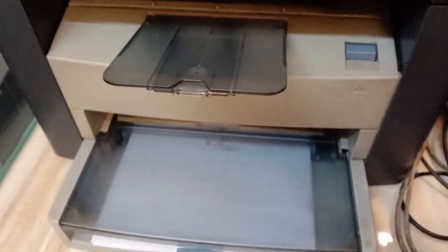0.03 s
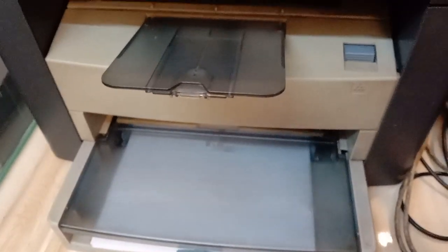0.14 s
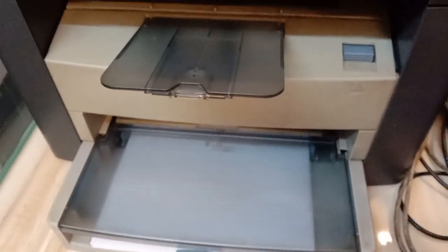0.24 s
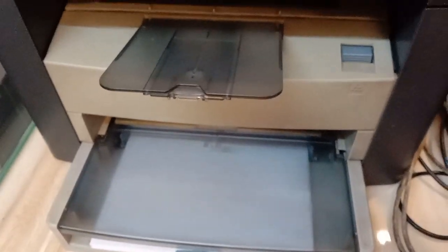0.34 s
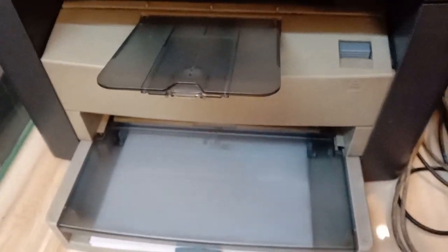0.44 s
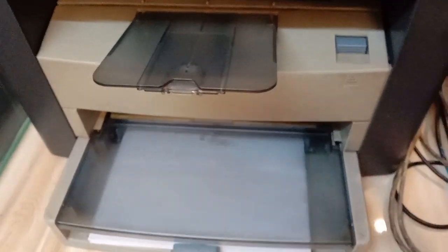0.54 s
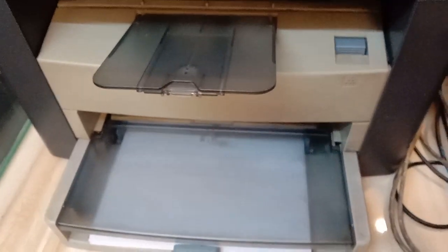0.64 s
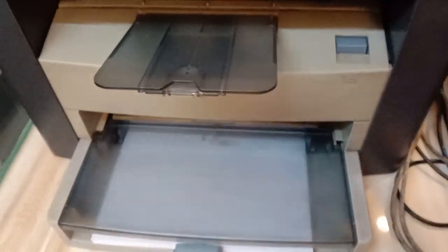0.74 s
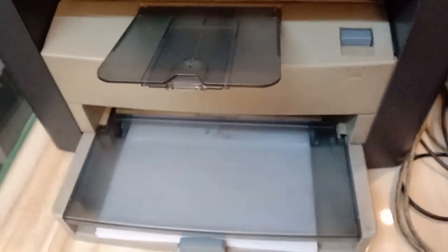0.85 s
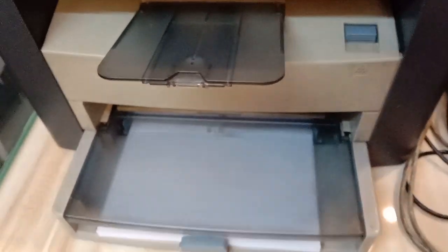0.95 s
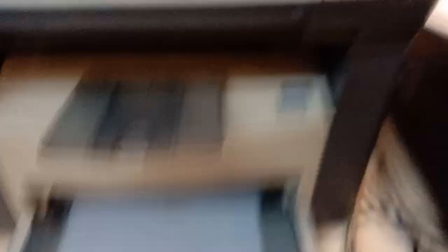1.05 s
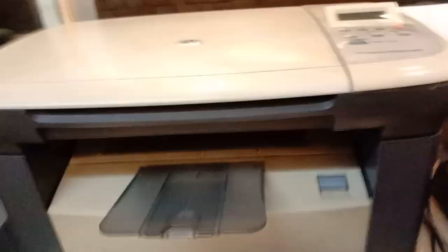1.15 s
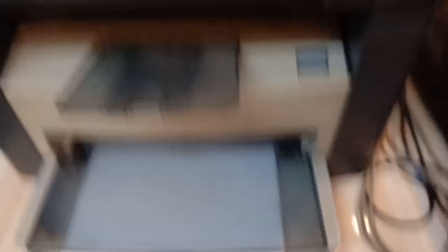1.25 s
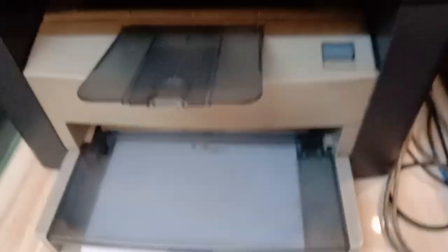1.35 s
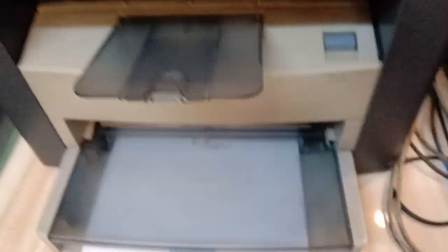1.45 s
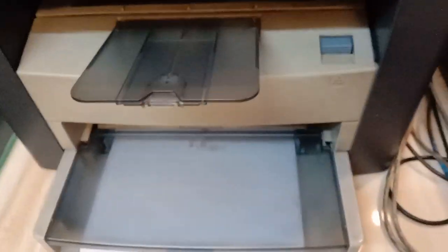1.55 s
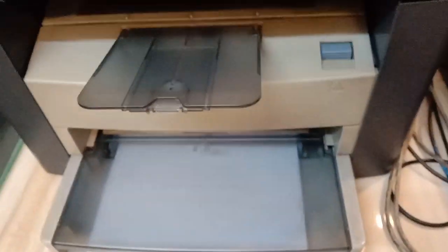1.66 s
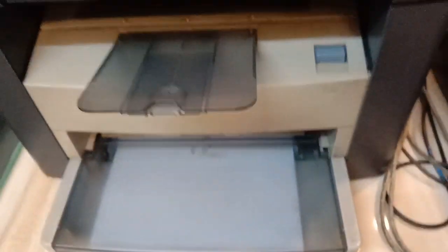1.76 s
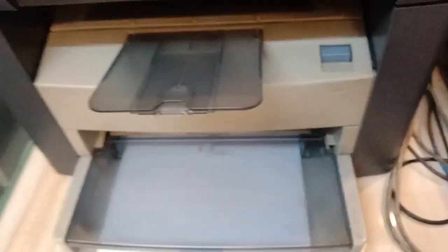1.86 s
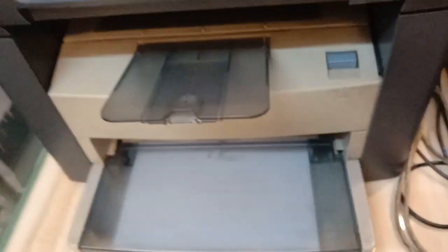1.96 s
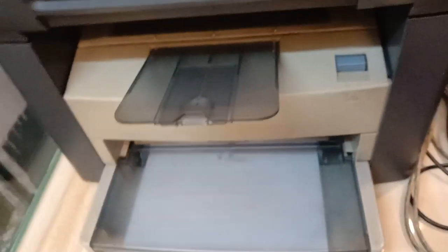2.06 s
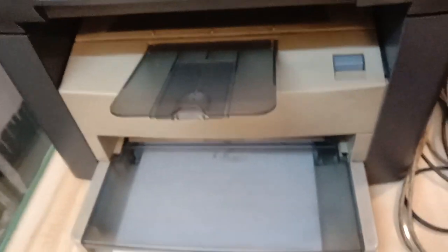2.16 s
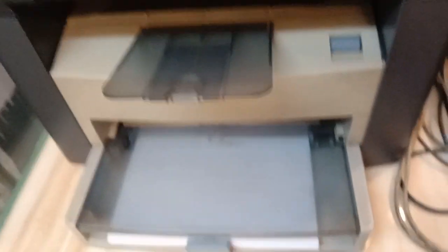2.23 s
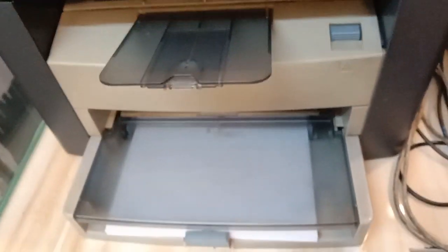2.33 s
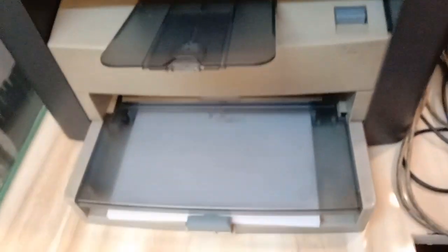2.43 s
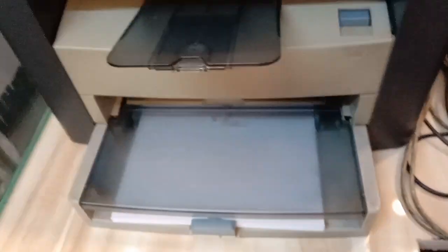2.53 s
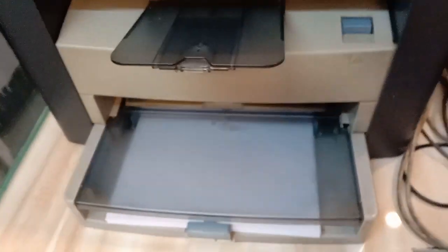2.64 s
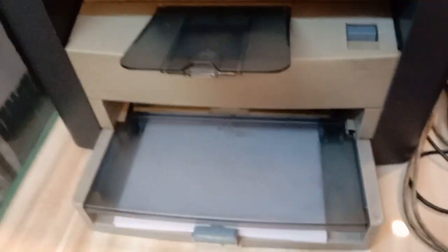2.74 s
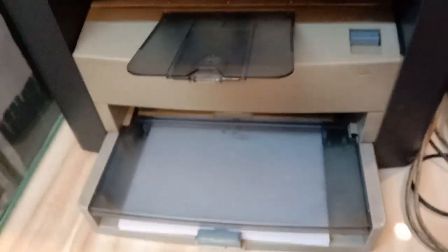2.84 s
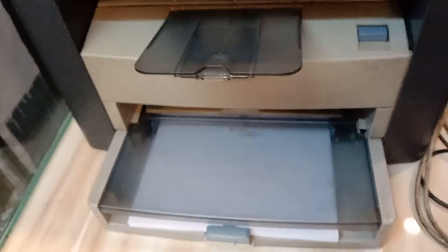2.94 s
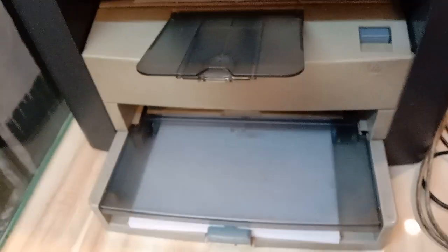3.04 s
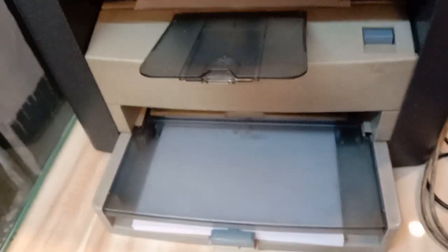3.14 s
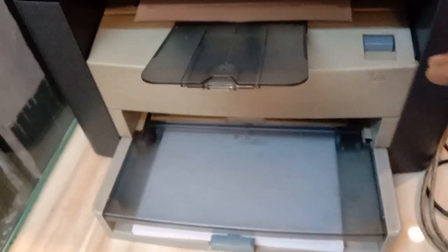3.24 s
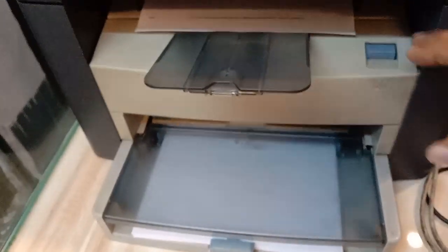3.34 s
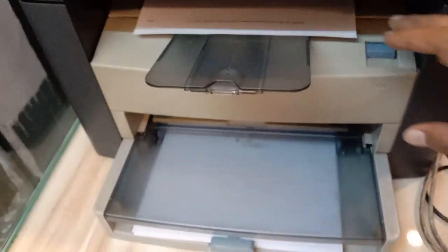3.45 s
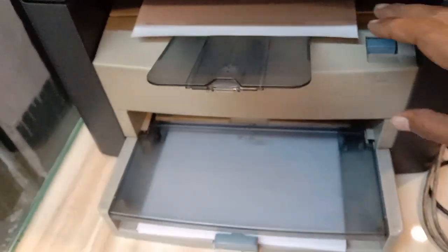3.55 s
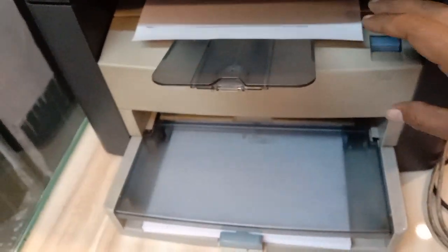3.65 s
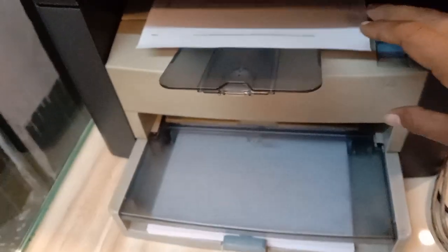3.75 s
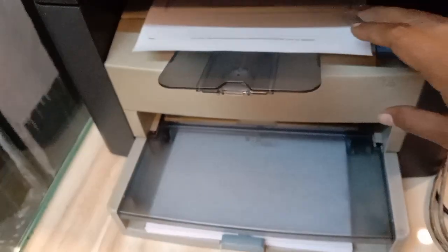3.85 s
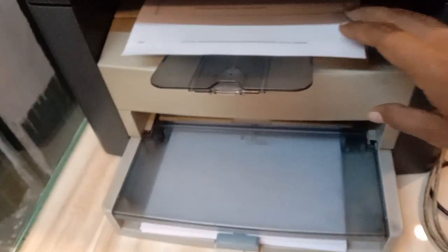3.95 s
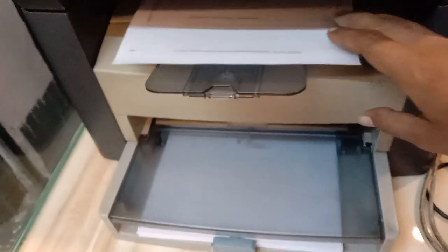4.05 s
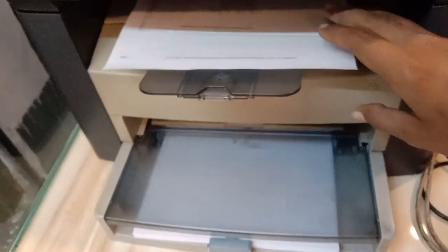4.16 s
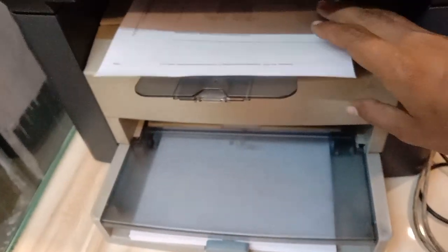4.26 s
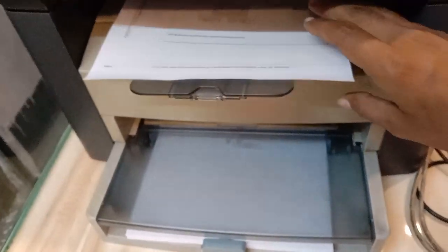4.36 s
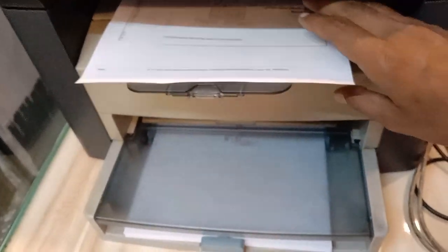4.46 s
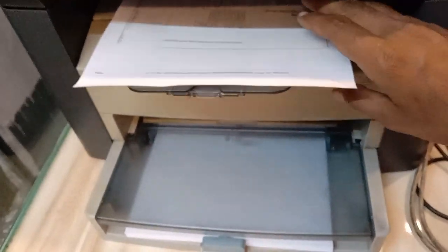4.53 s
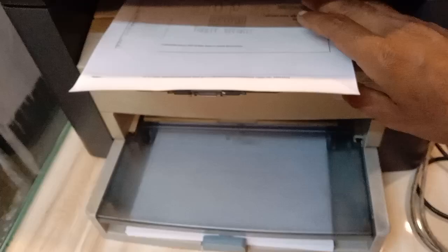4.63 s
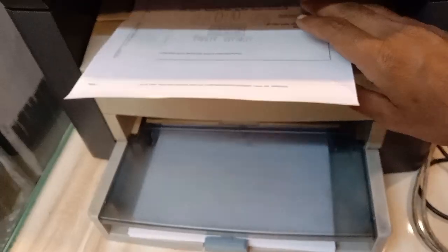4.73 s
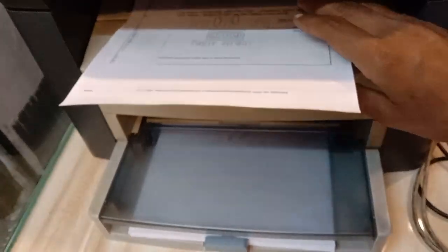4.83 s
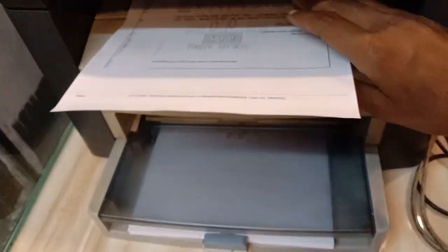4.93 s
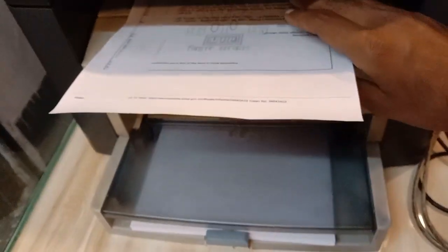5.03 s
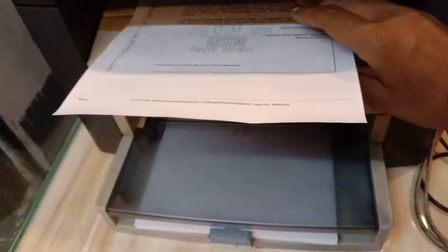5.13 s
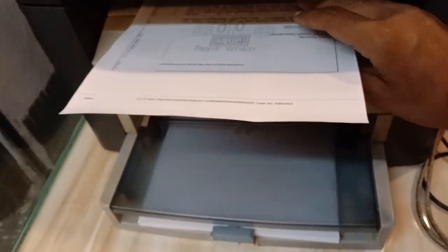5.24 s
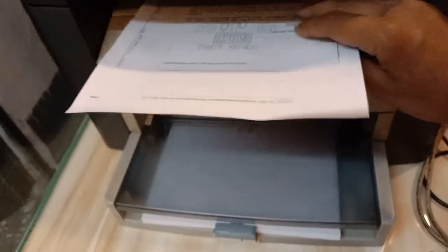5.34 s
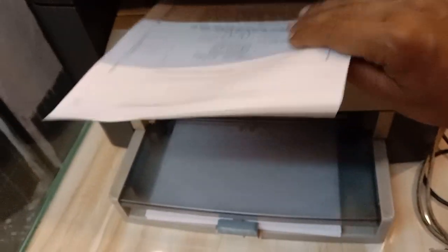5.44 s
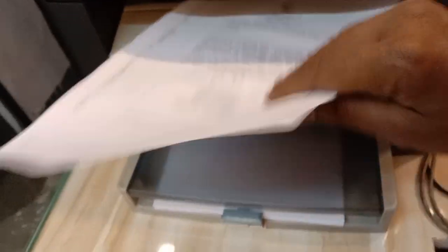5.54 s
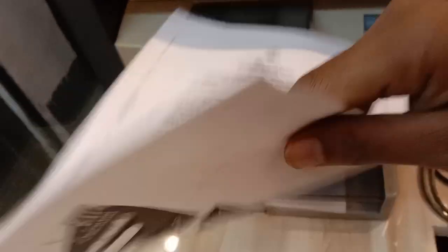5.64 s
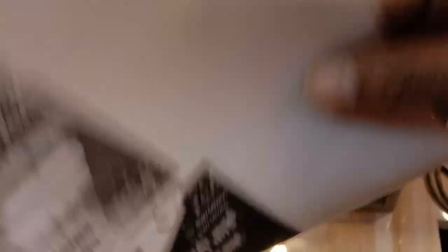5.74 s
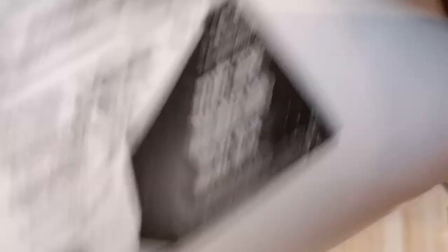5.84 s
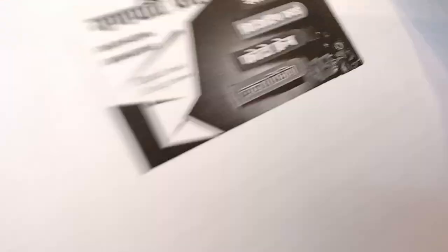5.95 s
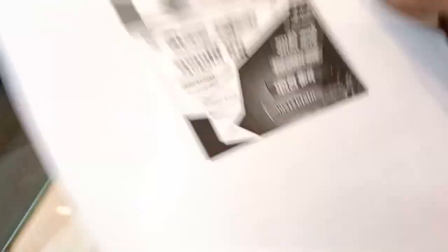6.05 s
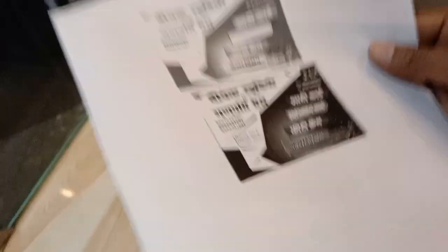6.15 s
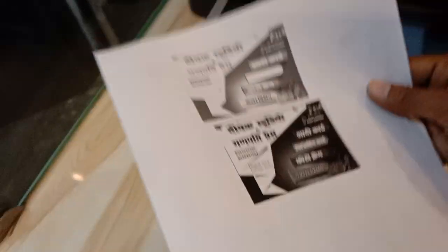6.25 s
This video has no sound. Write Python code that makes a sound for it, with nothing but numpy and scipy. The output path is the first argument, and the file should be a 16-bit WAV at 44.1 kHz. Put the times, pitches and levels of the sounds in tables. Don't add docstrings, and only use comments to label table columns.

```python
import sys
import numpy as np
from scipy import signal
from scipy.fft import rfft, irfft
from scipy.io import wavfile
from scipy.ndimage import uniform_filter1d, map_coordinates

SR = 44100
rng = np.random.default_rng(int(sys.argv[2]) if len(sys.argv) > 2 else 0)


def field_ratio(decibels):
    return 10 ** (np.asarray(decibels, dtype=float) / 20)


def wrap_up_sound(samples):
    columns = np.atleast_2d(samples).T
    tamed = np.clip(columns, -1, 1)
    steps = np.round(tamed * 32767).astype(np.int16)
    wavfile.write(sys.argv[1], SR, steps)


N = 277389
TIME = np.arange(N) / SR
SHAFT_HZ = 20.92
WHINE_STOP_S = 4.803


def walk(rate):
    hold = int(SR / rate)
    steps = np.repeat(rng.standard_normal(N // hold + 1), hold)
    smooth = uniform_filter1d(uniform_filter1d(steps, hold), hold)
    return 1.5 * smooth[:N]


def curves(table):
    s, *columns = np.transpose(table)
    return [np.interp(TIME, s, column) for column in columns]


def turning(hz, mean_db, swing_db, crest_s):
    return mean_db + swing_db * np.cos(2 * np.pi * hz * (TIME - crest_s))


def swells(events, width_s):
    return sum(db * np.exp(-((TIME - s) / width_s) ** 2 / 2) for s, db in events)


def dying(t, t60):
    return np.exp(-np.log(1000) * t / t60)


def tone(hz, db):
    return np.sqrt(2) * field_ratio(db) * np.sin(2 * np.pi * (hz * TIME + rng.random()))


def bed(spectrum, db, grain_db, patch_db, ripple_db):
    grains = np.minimum(rng.exponential(size=N // 64 + 1), 4)
    sizes = uniform_filter1d(np.repeat(field_ratio(grain_db * grains), 64)[:N], size=64)
    hz, s, cells = signal.stft(rng.standard_normal(N) * sizes, SR, nperseg=1024)
    octave = np.log2(np.maximum(hz, 1))
    points_hz, points_db = np.transpose(spectrum)
    colour = np.interp(octave, np.log2(points_hz), points_db, left=-200, right=-200)
    colour += ripple_db * np.sqrt(3) * uniform_filter1d(rng.standard_normal(len(hz)), size=3)
    pitch_place, time_place = np.meshgrid(9 * octave, s, indexing="ij")
    patches = 0
    for rate in (3, 25):
        heights = rng.standard_normal((140, 200))
        patches = patches + map_coordinates(heights, [pitch_place, rate * time_place], order=1)
    out = signal.istft(cells * field_ratio(colour[:, None] + patch_db * patches), SR)[1][:N]
    return out / np.std(out) * field_ratio(db)


def room(x):
    t = np.arange(SR // 3) / SR
    tail = rng.standard_normal(len(t)) * dying(t, 0.2) * (t > 0.004)
    return x + field_ratio(-15) * signal.fftconvolve(x, tail / np.linalg.norm(tail))[:N]


def air_swells():
    # crest t/s, width/s, lift level/dB, extra lift level/dB
    swell_table = [(0.0, 0.23, 7.5, -5), (1.1, 0.11, 11.5, 6), (1.55, 0.026, 8, 5), (1.75, 0.18, 5.5, -7),
                   (2.55, 0.38, 4.5, -3), (2.86, 0.14, 7.5, -1), (3.45, 0.15, 10, 9), (3.85, 0.2, 7, -1),
                   (4.45, 0.14, 8.5, 1), (5.08, .06, 4, 4), (5.54, 0.028, 5.5, 3), (5.78, 0.13, 10, -3)]
    s, width, lift_db, extra_db = np.transpose(swell_table)[:, :, None]
    shape = np.exp(-((TIME - s) / width) ** 2 / 2)
    return (lift_db * shape).sum(axis=0), (extra_db * shape).sum(axis=0)


def air(lift_db, extra_db):
    # f/Hz, level/dB per Hz
    air_colour = [(7500, -10), (8300, -6), (9500, -6), (11000, -8), (13000, -12.5), (14200, -16)]
    # f/Hz, level/dB per Hz
    sheen_colour = [(13300, -20), (14000, -9), (14500, -1), (15100, 1), (15500, -1), (15600, -30)]
    air_db = -74.5 + lift_db - 1 * (TIME > WHINE_STOP_S)
    sheen_db = -78.5 + lift_db + extra_db
    out = bed(air_colour, air_db + 0.5, grain_db=1.5, patch_db=-1.5, ripple_db=3.5)
    return out + bed(sheen_colour, sheen_db + 0.6, grain_db=0.6, patch_db=1.5, ripple_db=0.6)


def rumble(slide_db):
    # f/Hz, level/dB per Hz
    rumble_colour = [(25, -19), (45, -32), (68, -30), (92, 8.5), (130, -9), (240, 7), (320, -6), (420, 12),
                     (620, 4.5), (760, -18.5), (1000, -2.5), (1100, -4)]
    level_db = -53 + 0.057 * (slide_db + 53.5)
    return bed(rumble_colour, level_db, grain_db=1.2, patch_db=3.5, ripple_db=2.5)


def panel():
    # f/Hz, level/dB per Hz
    panel_colour = [(1150, 4), (1230, -14), (1270, 14), (1310, -17), (1400, -87)]
    level_db = -61.5 - 4 * (abs(TIME - 4.95) < 0.16)
    return bed(panel_colour, level_db, grain_db=0.3, patch_db=3, ripple_db=0.1)


def mirror_motor():
    # t/s, then level/dB of the second, third and fifth multiple
    facing = [(0, -61, -80, -77), (.4, -63, -75, -73), (.7, -60, -80, -75), (1.15, -64, -78, -72),
              (1.6, -59, -76, -79), (1.9, -58, -67, -78), (2.2, -68, -69, -79), (2.5, -64, -70, -82),
              (2.8, -69, -67, -67), (3.1, -77, -68, -66), (3.4, -81, -73, -68), (3.7, -75, -75, -65),
              (4.1, -71, -77, -68), (4.6, -70, -74, -70), (4.9, -64, -77, -76), (5.25, -64, -72, -71),
              (5.55, -69, -68, -74), (5.9, -80, -78, -76)]
    mirror_hz = 1010.2
    return sum(tone(k * mirror_hz, db + 2 * walk(18)) for k, db in zip((2, 3, 5), curves(facing)))


def rings():
    # t/s, peak level/dB, f/Hz, time to fall 60 dB/s
    ring_table = [(.06, -44, 820, 0.03), (.08, -41, 784, 0.026), (.17, -44.5, 780, .04),
                  (0.4151, -28.5, 1170, .015), (.415, -27.5, 554, 0.022), (.416, -38.5, 1990, 0.028),
                  (2.833, -36, 2200, .03), (5.128, -44, 3300, 0.045), (5.165, -46.5, 1270, 0.15),
                  (5.687, -38, 554, 0.043), (5.835, -53, 770, .04), (5.89, -39.5, 793, 0.068),
                  (.281, -31, 850, 0.031), (.413, -26, 826, .025), (.428, -31, 1265, 0.053),
                  (0.522, -36, 1235, 0.041), (1.848, -28, 1250, 0.081), (2.285, -36, 1530, 0.043),
                  (2.289, -47, 1270, .05), (2.411, -43, 910, 0.047), (2.51, -33.5, 1227, 0.045),
                  (2.661, -33.5, 1260, 0.071), (3.112, -44, 950, 0.045), (3.179, -32.5, 1210, 0.031),
                  (3.215, -46, 2570, .04), (3.6058, -31.5, 3690, 0.027), (3.6058, -30.5, 7100, .018),
                  (3.608, -33, 5780, .045), (3.612, -40, 11000, .025), (4.822, -44, 3050, 0.048),
                  (4.824, -53, 4050, .04), (4.827, -56, 5600, .03), (4.8407, -37, 1740, 0.07),
                  (4.842, -46, 4970, .03), (4.85, -39, 2940, .03), (4.919, -52, 1810, 0.078),
                  (4.92, -54, 5080, .05), (5.754, -40, 250, 0.087), (5.794, -43.5, 1040, 0.054),
                  (5.839, -43, 238, .07), (5.875, -38, 2420, .02), (5.879, -37, 1840, .025),
                  (5.884, -32, 1144, 0.025), (5.896, -36, 1000, .03), (5.93, -47, 1270, 0.23),
                  (6.189, -47, 1290, 0.035)]
    rise_cycles = 2.5
    t = np.arange(8192) / SR
    out = np.zeros(N + len(t))
    for s, db, hz, t60 in ring_table:
        shape = (1 - np.exp(-t * hz / rise_cycles)) * dying(t, t60)
        start = int(s * SR)
        out[start:start + len(t)] += field_ratio(db) * shape / shape.max() * np.sin(2 * np.pi * hz * t)
    return out[:N]


def bursts():
    # t/s, level/dB, centre f/Hz, spread/octaves
    tick_table = [(0.397, -44, 1080, 0.35), (0.405, -34, 1240, 0.11), (0.422, -41, 1100, 0.65),
                  (0.43, -50, 1250, 0.18), (0.485, -53, 2600, 0.33), (1.21, -55, 3000, 0.48),
                  (1.542, -68, 6000, 0.53), (1.85, -48, 1540, 0.37), (1.939, -41.5, 1960, 0.38),
                  (2.287, -41, 2000, 0.6), (2.411, -44, 900, 1.18), (2.509, -43.5, 2060, 0.71),
                  (2.593, -44.5, 2430, 0.44), (2.658, -45, 1700, 0.42), (2.717, -69, 8000, .8),
                  (2.939, -52, 4000, 1.1), (3.179, -48.5, 2550, 0.59), (3.197, -48, 1350, 0.99),
                  (3.214, -44, 1330, 0.84), (3.613, -39, 3000, 0.97), (.283, -53, 3200, 0.66),
                  (3.845, -47, 1830, 0.99), (3.925, -56, 2720, .28), (4.062, -61, 6800, 0.27),
                  (4.429, -60, 8000, .31), (4.498, -52.5, 2770, 0.75), (5.122, -45.5, 8000, 0.51)]
    # t/s, level/dB, centre f/Hz, spread/octaves
    gate_table = [
        (3.6062, -35, 8000, .9),
        (3.614, -46, 3800, .1),
    ]
    # t/s, level/dB, centre f/Hz, spread/octaves
    blow_table = [(0.4132, -30, 900, 0.22), (0.4148, -38.5, 3000, 0.49), (1.179, -53, 1900, 0.29),
                  (1.8482, -43, 2000, 0.67), (2.286, -57, 9000, 0.56), (2.495, -56, 5000, .8),
                  (2.51, -55, 6500, 0.62), (2.549, -58, 7500, 0.48), (2.5953, -59, 7000, 0.65),
                  (1.75, -63, 5040, 0.55), (1.621, -62, 5200, .3), (2.02, -52, 850, 0.22),
                  (3.132, -63, 5200, 0.2), (3.18, -69, 5500, 0.54), (3.199, -72, 6800, .2),
                  (3.214, -50, 5270, 0.13), (5.678, -56, 1490, 1.1), (5.793, -52, 1500, 0.7),
                  (5.879, -42, 2300, 0.49), (5.885, -42, 1110, 0.2), (5.904, -47, 1090, 0.17),
                  (6.188, -51, 1300, 0.45), (4.843, -46, 1980, 0.28)]
    # t/s, level/dB, centre f/Hz
    snap_table = [
        (1.13, -42, 11000),
        (1.179, -48, 11000),
    ]
    # t/s, level/dB, f/Hz, length/s
    ping_table = [(0.072, -66, 770, 0.014), (0.174, -68, 780, 0.01), (0.294, -48, 810, 0.0038),
                  (0.523, -42, 1184, 0.004), (1.563, -63, 5600, 0.087), (2.546, -58, 9300, .003),
                  (2.587, -57.5, 9300, .003), (2.675, -61, 5530, 0.016), (3.26, -53.5, 2200, .004),
                  (3.62, -53, 5900, .008), (3.616, -51, 7200, .003), (4.062, -52, 2650, .008),
                  (4.589, -51.5, 2740, .004), (4.839, -49, 1700, 0.014), (4.918, -60, 1790, 0.019),
                  (5.095, -53, 585, 0.0087), (5.133, -54.5, 1270, 0.025), (5.936, -55, 1270, 0.018)]
    # t/s, level/dB, centre f/Hz, spread/octaves, length/s
    rustle_table = [(0.309, -48.5, 267, 0.14, 0.13), (0.414, -41.5, 330, 0.36, 0.037),
                    (0.429, -57, 1800, 1, 0.049), (1.584, -66, 2050, 1.15, 0.14),
                    (2.83, -38.5, 2110, 0.73, 0.015), (2.845, -39, 2020, 0.5, 0.01),
                    (2.907, -53, 2760, 0.39, 0.15), (4.822, -50, 2600, 0.57, 0.021),
                    (4.831, -45, 2430, 0.24, 0.017), (5.112, -41, 2820, 0.66, 0.021),
                    (5.138, -50, 2130, 0.91, 0.028), (5.505, -56, 4380, 0.54, 0.012),
                    (5.662, -49, 1600, 0.78, 0.039), (5.664, -48, 414, 0.56, 0.091),
                    (2.36, -49.5, 190, 0.18, 0.076), (1.526, -57.5, 5200, 0.23, 0.075),
                    (0.496, -66, 1480, 0.27, 0.15), (5.738, -62, 1460, 1, 0.12),
                    (5.803, -55, 850, 0.24, 0.12), (5.863, -43, 1800, 0.6, 0.033),
                    (2.689, -62, 7000, .18, 0.059), (2.83, -60, 5300, .1, 0.17),
                    (2.964, -57, 5020, 0.093, 0.16), (5.071, -51, 260, 0.63, 0.16),
                    (6.037, -62, 2520, 0.71, 0.034), (6.184, -43, 1130, 0.15, 0.016),
                    (6.19, -59, 2390, 0.68, 0.028)]
    # spread/octaves, length/s, time to fall 60 dB/s
    every = [(*row, 0.0073, 0.095) for row in tick_table]
    every += [(*row, 0.0015, 0.03) for row in gate_table]
    every += [(*row, 0.0019, 0.097) for row in blow_table]
    every += [(*row, 0.38, 0.0009, 0.012) for row in snap_table]
    every += [(s, db, hz, 0.077, length, 0.1) for s, db, hz, length in ping_table]
    every += [(*row, 0.11) for row in rustle_table]
    return every


def clicks():
    # f/Hz, width/Hz, boost level/dB
    casing_table = [(1270, 22, 22), (1960, 32, -14), (3220, 83, 9), (5600, 220, 10.5), (7470, 1700, 13),
                    (11000, 210, 7), (15500, 2300, 16), (9300, 630, 6.5), (13500, 570, -13),
                    (8000, 600, -22)]
    t = np.arange(8192) / SR
    hz = np.maximum(np.arange(len(t) // 2 + 1) * SR / len(t), 1)
    casing = field_ratio(sum(db / (1 + (2 * (hz - f) / width) ** 2) for f, width, db in casing_table))
    out = np.zeros(N + len(t))
    for s, db, centre_hz, spread, length, t60 in bursts():
        parts = field_ratio(16 * uniform_filter1d(rng.standard_normal(len(hz)), size=50))
        hump = np.exp(-(np.log2(hz / centre_hz) / spread) ** 2 / 2)
        burst = irfft(rfft(rng.standard_normal(len(t))) * casing * parts * hump)
        crackle = field_ratio(4.5 * uniform_filter1d(np.repeat(rng.standard_normal(128), 64), size=64))
        rise_s = 0.000064 + 0.17 * max(length - 0.005, 0)
        shape = np.clip(t / rise_s, 0, 1) * dying(np.maximum(t - length, 0), t60)
        start = int(s * SR)
        out[start:start + len(t)] += field_ratio(db) * burst / np.std(burst) * crackle * shape
    treble_limit = signal.ellip(10, 0.2, 70, 15500, fs=SR, output="sos")
    return signal.sosfilt(treble_limit, room(out[:N]))


def latch():
    # t/s, peak level/dB
    blow_times = [
        (1.08922, -8.5),
        (1.0902, -3),
        (1.09098, -9),
    ]
    # f/Hz, level/dB, time to fall 60 dB/s
    housing_notes = [(1270, -12, 0.042), (1330, -9, .011),
                     (660, 4, 0.013), (850, 10.5, 0.0028), (1600, 8, 0.0032), (2420, -3.5, 0.0041),
               (3000, -12, 0.0034), (3800, 3, 0.0015), (5200, -10, 0.0027), (6860, -12.5, 0.0033),
               (11000, 2, 0.00084), (14600, -14, 0.0041)]
    t = np.arange(4096) / SR

    def swing(hz, db, t60):
        return field_ratio(db) * np.sin(2 * np.pi * hz * t) * dying(t, t60)

    ring = -sum(swing(*mode) for mode in housing_notes) * (1 - np.exp(-t / 0.00031))
    out = np.zeros(N)
    for s, db in blow_times:
        start = int(s * SR)
        out[start:start + len(t)] += field_ratio(db) * ring
    out = signal.sosfilt(signal.butter(2, 480, "high", fs=SR, output="sos"), out)
    start = int(blow_times[1][0] * SR)
    out[start:start + len(t)] += swing(114, -30, 0.026)
    return out


def sheet_travel():
    # t/s, slide level/dB, scrape level/dB
    sheet = [(0.0, -51, -57), (0.46, -52, -63), (0.68, -57.5, -63.5), (0.95, -60.5, -63), (1.2, -52.5, -65),
             (1.5, -59.5, -61.5), (1.66, -50, -68), (1.89, -44.5, -65), (2.1, -48.5, -64.5),
             (2.6, -44.5, -64), (2.74, -47, -58.5), (2.95, -57, -59.5), (3.7, -58, -62),
             (4.5, -56.5, -60.5), (4.85, -59, -64.5), (5.25, -62.5, -67), (5.8, -65.5, -64),
             (6.29, -66, -71)]
    return curves(sheet)


def paper(slide_db, scrape_db, lift_db):
    # f/Hz, level/dB per Hz
    slide_colour = [(500, -49), (800, 1), (1100, -4), (1270, 23.5), (1450, 7.5), (2100, 6.5), (2700, 5.5),
                    (3300, 7.5), (3900, -6), (4800, -19)]
    # f/Hz, level/dB per Hz
    hiss_colour = [(3300, 4.5), (4000, 6.5), (4400, -2.5), (5100, 8.5), (5700, 5.5), (6400, -1.5),
                   (7200, 4.5), (8000, -6.5), (9000, -33)]
    # f/Hz, level/dB per Hz
    streak_colour = [(1350, -27), (1500, -0.5), (2200, 4), (3000, -4), (3600, -9.5), (4200, -18)]
    # f/Hz, level/dB per Hz
    low_band_colour = [(640, -31), (720, -1.5), (800, 11.5), (900, 1.5), (960, -20)]
    hiss_db = scrape_db + 0.5 * lift_db
    low_band_db = -67.5 + 0.32 * (slide_db + 52.5)
    out = bed(slide_colour, slide_db - 1.2, grain_db=2.4, patch_db=3.3, ripple_db=2.4)
    out += bed(hiss_colour, hiss_db + 0.35, grain_db=2.4, patch_db=3.2, ripple_db=2.2)
    out += bed(streak_colour, slide_db - 4.5, grain_db=3.5, patch_db=3.5, ripple_db=3)
    return out + bed(low_band_colour, low_band_db, grain_db=2, patch_db=5.5, ripple_db=-3.5)


def hand():
    # t/s, level/dB
    hand_table = [
        (5.0, -72),
        (5.1, -56),
        (5.3, -80),
        (5.62, -64),
        (5.69, -46),
        (5.77, -57.5),
        (5.89, -52),
        (5.97, -60),
        (6.29, -69),
    ]
    # f/Hz, level/dB per Hz
    hand_colour = [(180, -15), (260, 8), (400, -1), (800, 3), (1200, -2), (2000, -7), (4000, -4.5),
                   (5000, -37)]
    hand_db = np.where(TIME > hand_table[0][0], curves(hand_table)[0], -120)
    return bed(hand_colour, hand_db, grain_db=3, patch_db=6.5, ripple_db=6)


def rollers():
    # t/s, lift level/dB
    knock_table = [(.08, 14.5), (.3, 8), (.5, 20), (.9, 20.5), (1.21, 21.5), (1.55, 17), (1.79, 19.5),
                   (1.95, 12.5), (2.1, 13), (2.42, 21), (3.15, 16), (3.83, 9.5), (4.5, 19), (4.86, 2.5),
                   (5.11, 7), (5.76, 15), (5.93, 14), (6.252, 9)]
    # f/Hz, level/dB per Hz
    knock_colour = [(140, -17), (175, 3), (220, 8.5), (265, 7.5), (320, -21)]
    drone_db = turning(1.5, -65.5, 3.9, 0.43) + np.interp(TIME, [0.9, 1.3, 1.7], [-2, -9, 0])
    knock_db = -68 + swells(knock_table, 0.076)
    out = tone(87, drone_db + 1.5 * walk(12))
    out += bed(knock_colour, knock_db, grain_db=-5, patch_db=5, ripple_db=3)
    return out + tone(215.7, knock_db - 7 + 3 * walk(12))


def whine():
    # t/s, level/dB, level/dB of the third multiple against the first
    whine_table = [(0.0, -42, -21), (0.35, -45.5, -37), (0.49, -42, -39), (0.69, -44, -46),
                   (0.98, -42.5, -42), (1.22, -44.5, -20.5), (1.79, -39, -26.5), (2.27, -41, -13),
                   (2.66, -42, -21.5), (2.98, -47, -17), (3.46, -44, -21), (3.6, -42.5, -21),
                   (4.1, -43.5, -46), (4.48, -44.5, -34), (4.8, -49, -36)]
    whine_hz, turn_hz = 1225.5, 29.5
    first_db, strain_db = curves(whine_table)
    side_db = first_db - 15 + 5 * np.exp(-TIME / 0.5)
    out = tone(whine_hz, first_db + walk(24.92))
    out += tone(3 * whine_hz, first_db + strain_db + 2 * walk(14))
    out += tone(whine_hz + turn_hz, side_db + 3 * walk(15))
    return out * np.clip((WHINE_STOP_S - TIME) / 0.0067, 0, 1)


def main_motor(slide_db):
    # t/s, level/dB
    hum_table = [(0.0, -41), (0.28, -37.5), (0.7, -41), (0.95, -39.5), (1.21, -43), (1.35, -40),
                 (1.93, -38), (2.38, -40.5), (2.7, -39), (3.25, -42), (3.5, -38.5), (4.1, -38.5),
                 (5.0, -38), (5.68, -39.5), (5.83, -44), (5.95, -41.5), (6.29, -43)]
    # t/s, lift level/dB
    octave_table = [
        (.4, 14),
        (.9, 19),
        (3.0, 12),
        (4.35, 12),
        (5.3, 22),
    ]
    # multiple of the shaft's turns, level/dB, wander level/dB
    gear_table = [(216, -70, 4), (264, -77, 4)]
    mesh_hz = 24 * SHAFT_HZ
    hum_db = curves(hum_table)[0] + turning(3.16, 0, 0.44, 0.29) * (1 + 0.2 * TIME)
    hum_db = hum_db + 0.5 * np.sin(2 * np.pi * SHAFT_HZ * TIME)
    drum_db = turning(1.32, -64, 11, 0.46) - 6 * (abs(TIME - 2.7) < 0.3)
    third_db = -69.5 + 0.9 * (slide_db + 58.5) + 5 * (TIME < 0.85)
    out = tone(mesh_hz, hum_db + 0.4 * walk(30))
    out += tone(20 * SHAFT_HZ, drum_db + 1.5 * walk(15))
    out += tone(3 * mesh_hz, third_db + 2 * walk(15))
    out += tone(2 * mesh_hz, -83 + swells(octave_table, 0.12))
    for multiple, db, wander_db in gear_table:
        out += tone(multiple * SHAFT_HZ, db - 3 * TIME + wander_db * walk(8.6))
    return out


def scene():
    slide_db, scrape_db = sheet_travel()
    lift_db, extra_db = air_swells()
    out = air(lift_db, extra_db) + rumble(slide_db) + panel() + mirror_motor()
    out += rings() + clicks() + latch()
    out += paper(slide_db, scrape_db, lift_db) + hand()
    out += rollers() + whine() + main_motor(slide_db)
    return out[None]


def low_pass(x):
    return signal.sosfilt(signal.butter(12, 16820, fs=SR, output="sos"), x)


def record(dry):
    mix = signal.sosfilt(signal.butter(2, 66, "high", fs=SR, output="sos"), dry)
    return low_pass(mix)


dry = scene()
out = record(dry)
wrap_up_sound(out)
```